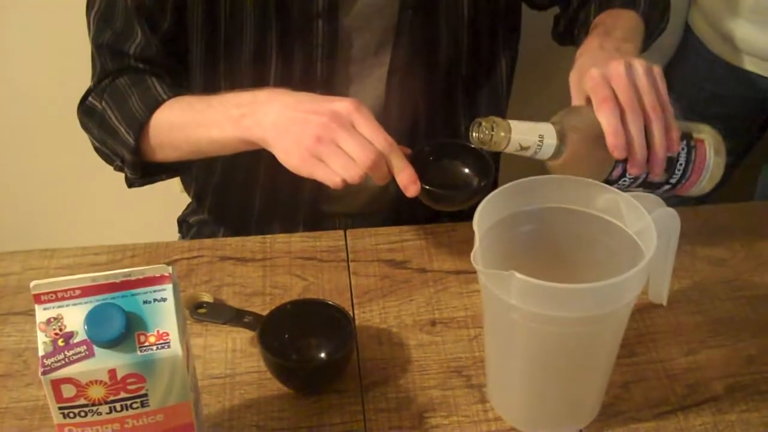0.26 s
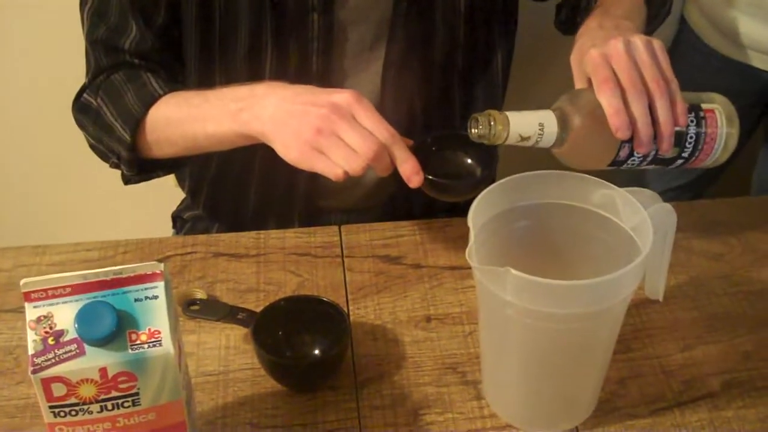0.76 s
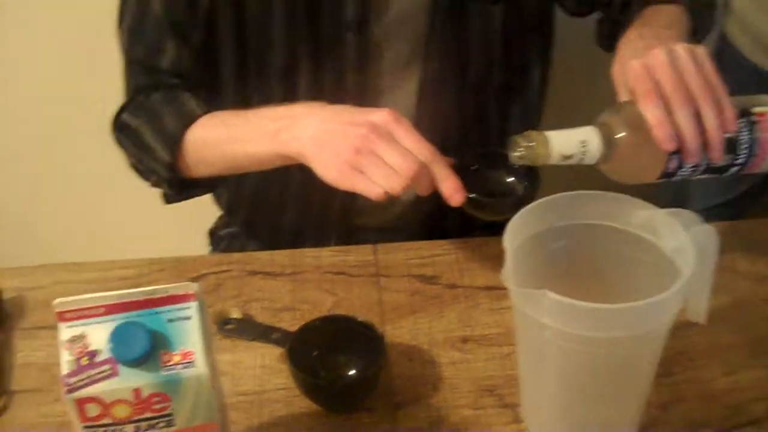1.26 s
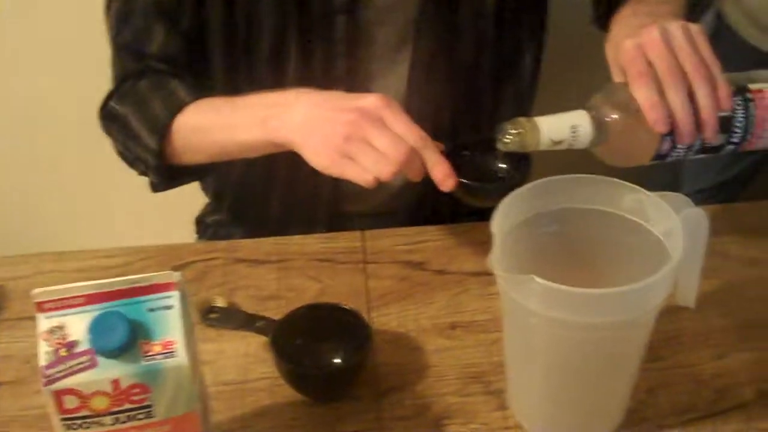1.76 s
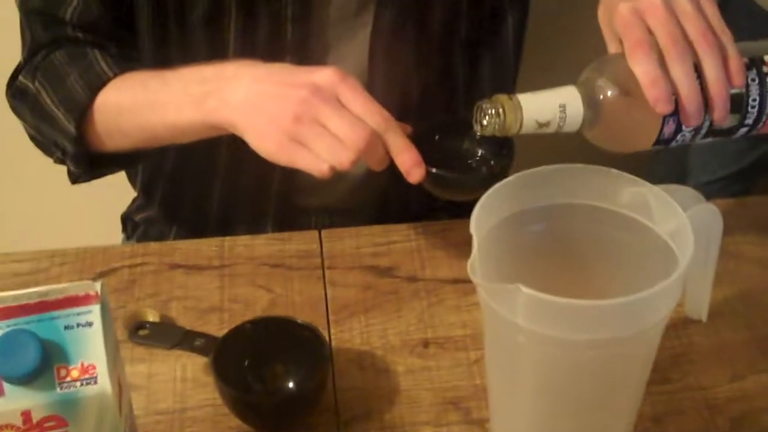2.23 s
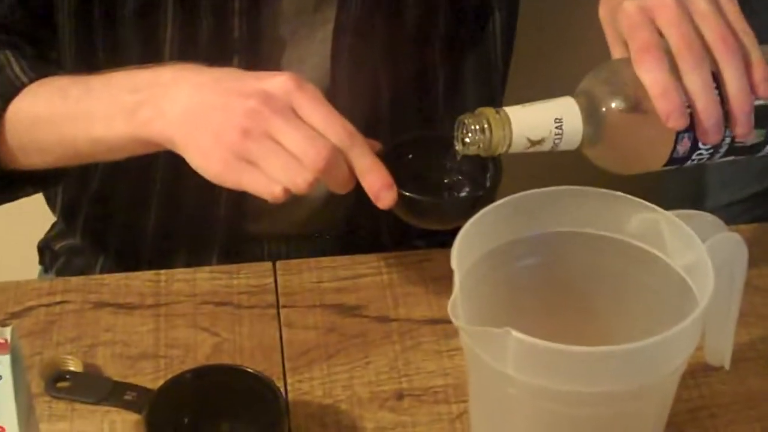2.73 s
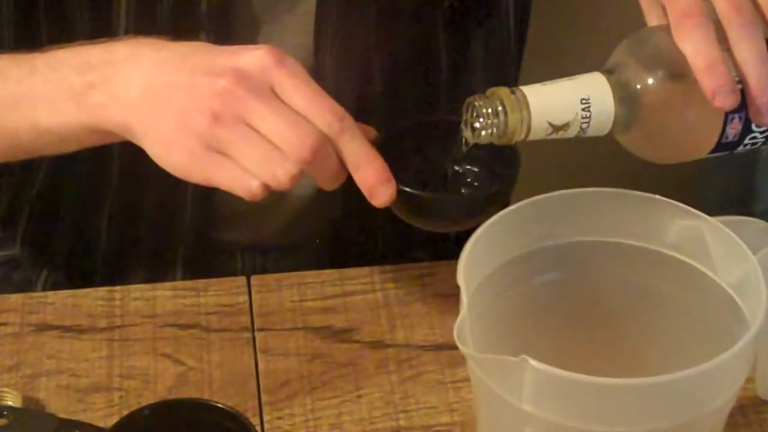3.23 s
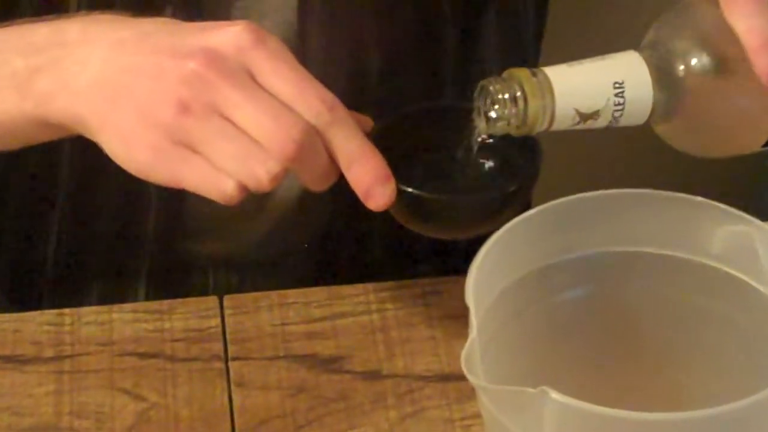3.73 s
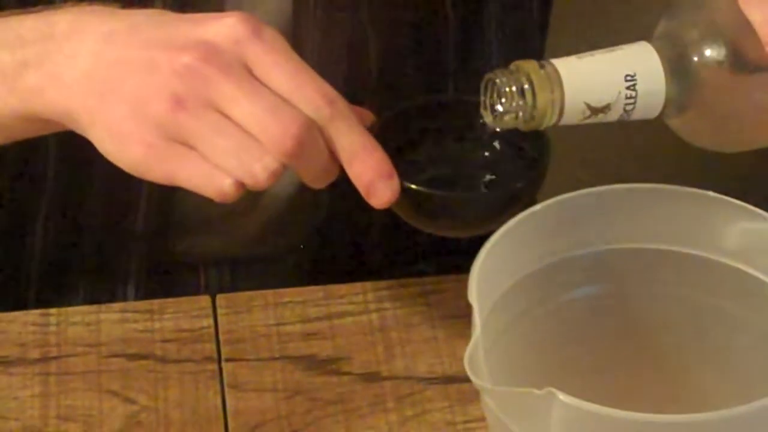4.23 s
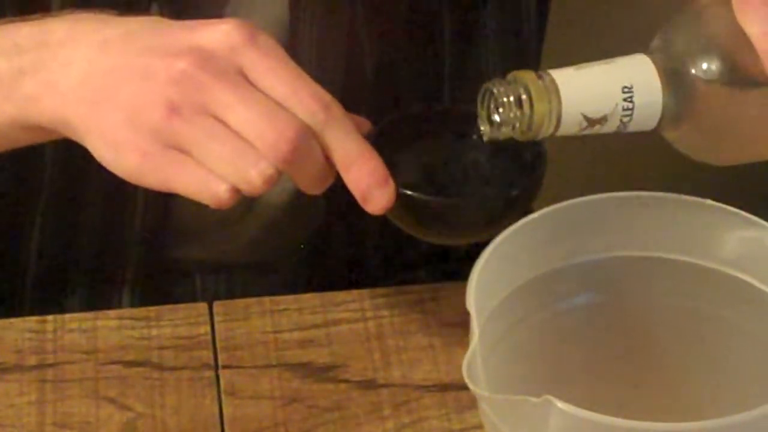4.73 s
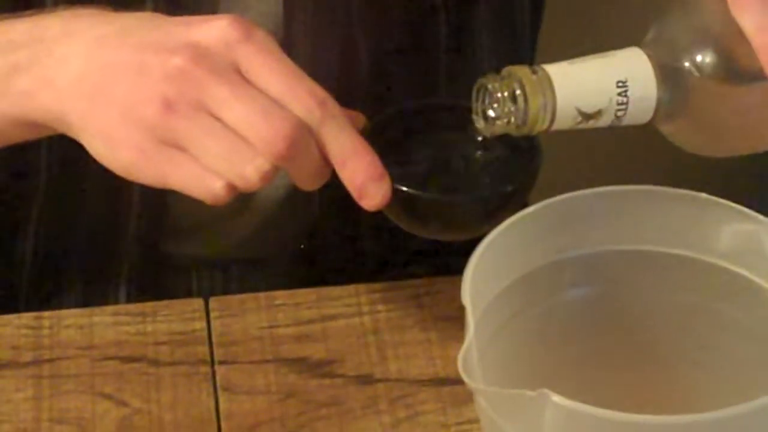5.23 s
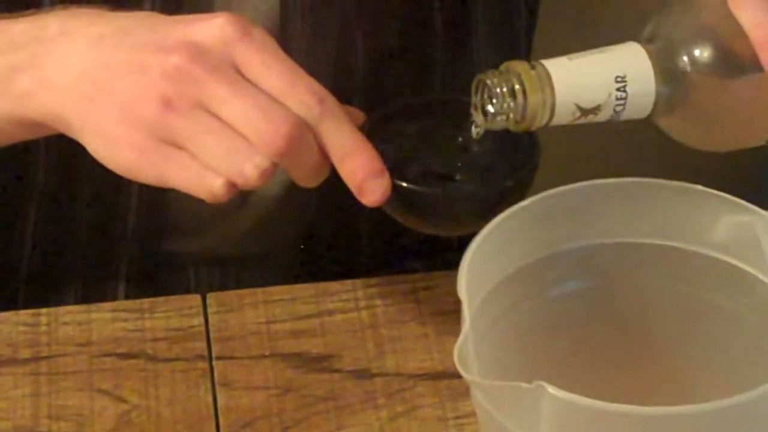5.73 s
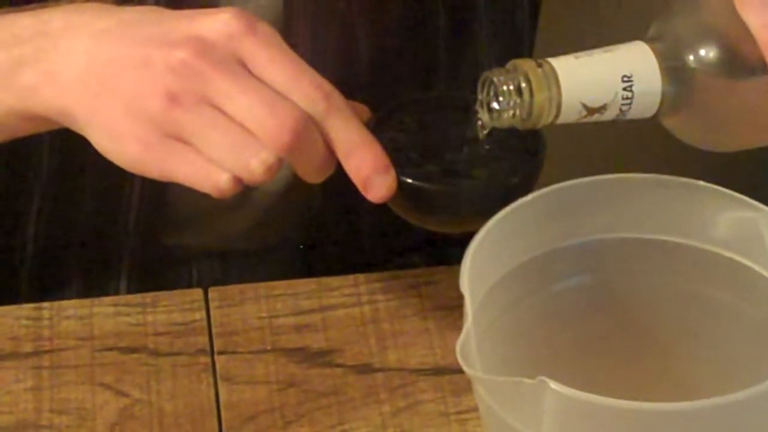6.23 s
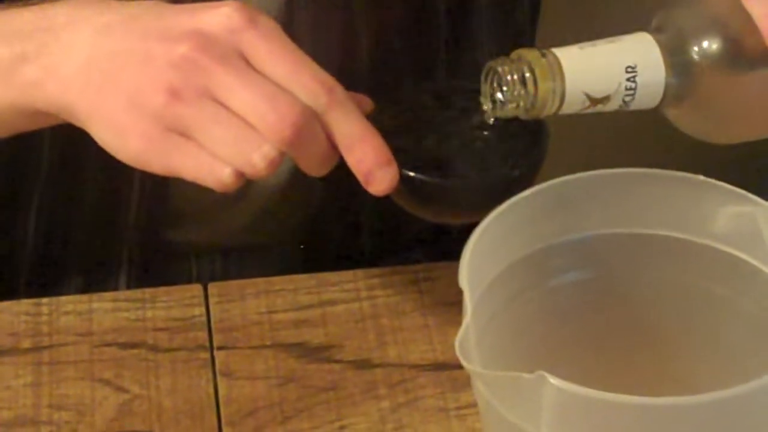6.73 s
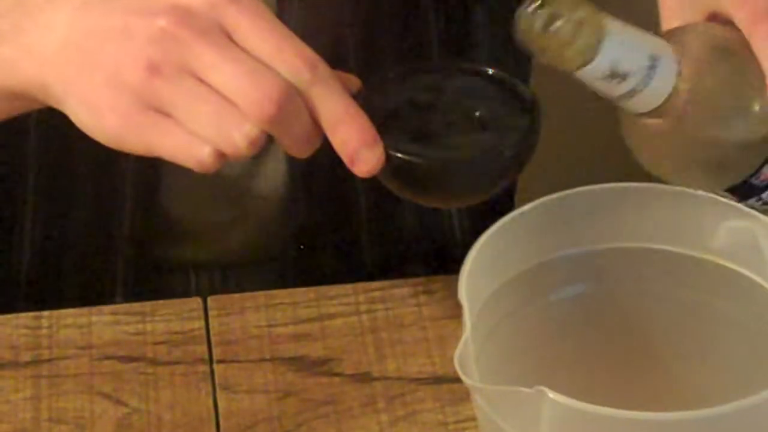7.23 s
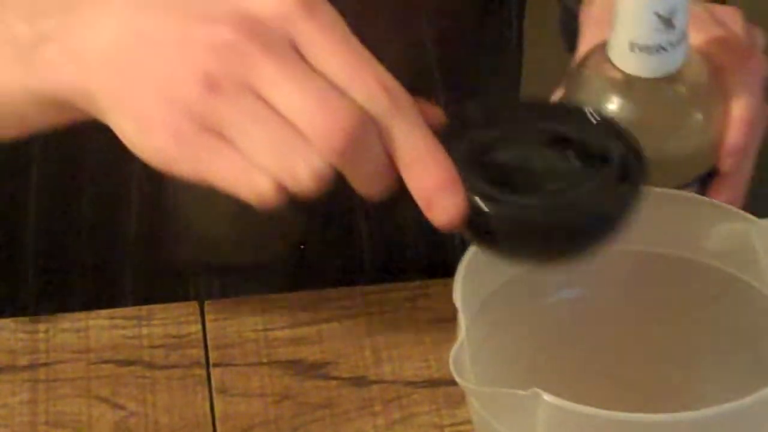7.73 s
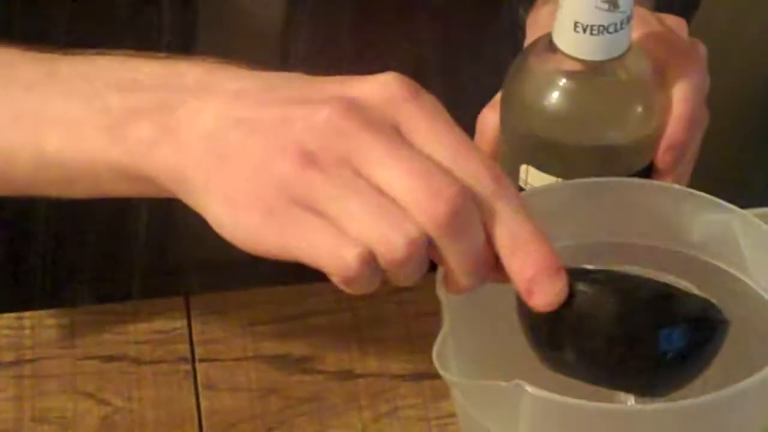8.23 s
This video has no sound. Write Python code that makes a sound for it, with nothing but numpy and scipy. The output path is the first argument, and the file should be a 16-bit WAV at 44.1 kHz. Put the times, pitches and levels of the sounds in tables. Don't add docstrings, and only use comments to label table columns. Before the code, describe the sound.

Close stereo pickup indoors: steady soft hum and airy hiss throughout. Hollow, quick glugs from a bottle neck, pitch rising as it tips, with tiny bubble plinks, crisp taps on a plastic cup, glassy clinks and soft hand bumps. Pouring fades to a few drips, then a pause. A hard wooden thunk with short rocking knocks follows, and liquid slaps and bubbles brightly into a plastic pitcher, ending abruptly.

```python
import sys
import numpy as np
from scipy import signal
from scipy.fft import rfft, irfft
from scipy.io import wavfile
from scipy.ndimage import uniform_filter1d, map_coordinates

SR = 44100
rng = np.random.default_rng(int(sys.argv[2]) if len(sys.argv) > 2 else 0)


def dump_mix(stems):
    frames = np.atleast_2d(stems).T
    limited = np.clip(frames, -1, 1)
    pcm = np.round(limited * 32767).astype(np.int16)
    wavfile.write(sys.argv[1], SR, pcm)


def amplitude_ratio(level_db):
    exponent = np.asarray(level_db, float) / 20
    return 10 ** exponent


N = 373659


def at_hz(points, hz):
    table_hz, values = np.array(points).T
    return np.interp(np.log(np.maximum(hz, 1)), np.log(table_hz), values)


def rms_one(x):
    return x / np.sqrt(np.mean(x ** 2) + 1e-20)


def drift(rate_hz):
    knots = rng.standard_normal(400)
    return map_coordinates(knots, [20 + np.arange(N) / SR * rate_hz], order=3)


def add_ring(out, s, db, hz, t60, rise=0., attack_s=0.0003):
    start = int(s * SR)
    t = np.arange(min(int(t60 * SR), N - start)) / SR
    shape = amplitude_ratio(db - 60 * t / t60) * (1 - np.exp(-t / attack_s))
    out[start:start + len(t)] += shape * np.sin(2 * np.pi * hz * (t + rise * t * t / (2 * t60)))


def around(x, hz, octaves):
    edges = np.clip(hz * 2 ** (np.array([-.5, .5]) * octaves), 100, 18000)
    return signal.sosfilt(signal.butter(2, edges, "band", fs=SR, output="sos"), x)


def add_crack(out, s, db, hz, octaves, t60, attack_s=.0001):
    start = int(s * SR)
    t = np.arange(int(SR * min(t60 + .01, .2))) / SR
    burst = rng.standard_normal(len(t)) * amplitude_ratio(-60 * t / t60) * (1 - np.exp(-t / attack_s))
    burst = around(burst, hz, octaves)[:N - start]
    out[start:start + len(t)] += amplitude_ratio(db) * burst / np.abs(burst).max()


def add_click(out, s, db, hz, octaves):
    start = int(s * SR)
    pulse = around(signal.unit_impulse(SR // 50), hz, octaves)[:N - start]
    out[start:start + len(pulse)] += amplitude_ratio(db) * pulse / np.abs(pulse).max()


def add_struck(out, s, db, modes, spread_db):
    for hz, mode_db, t60 in modes:
        luck, late = rng.standard_normal(2)
        add_ring(out, s + .0004 * abs(late), db + mode_db + spread_db * luck, hz, t60)


def tone(hz, db, pan_db, lead):
    phase = 2 * np.pi * hz * np.arange(N) / SR + 0.46 * drift(1.57) + rng.uniform(0, 2 * np.pi)
    level = np.sqrt(2) * amplitude_ratio(db + drift(2.803))
    ports = amplitude_ratio(np.array([[pan_db / 2], [-pan_db / 2]]))
    return level * ports * np.sin(phase + [[lead], [0]])


# [f/Hz, level/dB rms, left-right/dB, left lead/rad]
HUM = [(118.8, -67.5, -2.5, 0.091), (147, -80, 1, 0.11), (218.5, -51.5, 1, 0.085), (232.7, -63, -4, .1),
       (326.3, -61, 0.5, 0.11), (468.7, -51, .5, 0.39), (829, -67.5, 6, .3), (3710, -83, 19.5, 0.46)]
# [f/Hz, level at rest/dB, gain under load/dB, busiest t/s, width/s]
WHINES = [(6000, -78.5, 5.5, 6.1, 0.61), (7000, -84.5, 5, 5.7, .7), (8000, -78.5, 9.5, 11, 8.5)]
# [left-right/dB, left lead/rad]
WHINE_PORTS = [(-10.5, 1.9), (19, 1.4), (20.5, 2.7)]


def hum():
    t = np.arange(N) / SR
    out = sum(tone(*row) for row in HUM)
    for (hz, db, load_db, s, width_s), (pan_db, lead) in zip(WHINES, WHINE_PORTS):
        load = np.exp(-((t - s) / width_s) ** 2)
        out = out + tone(hz, db + load_db * load + .8 * drift(1.11), pan_db, lead)
    return out


def motor():
    motor_hz, motor_db, beat_s, null_s = 58.8, -68.5, 2.24, 1.76
    t = np.arange(N) / SR
    beat, turn = np.pi * (t - null_s) / beat_s, 2 * np.pi * motor_hz * t
    pair = np.sin(beat) * np.sin(turn) + 0.11 * np.cos(beat) * np.cos(turn)
    return 2 * amplitude_ratio(motor_db) * pair * amplitude_ratio([[-.9], [.9]])


# [f/Hz, likeness]
LIKENESS = [(60, 0.34), (150, 0.87), (380, 0.95), (940, 0.87), (2350, 0.37), (5890, 0), (14800, 0.22)]


def alike_at(hz):
    return np.clip(at_hz(LIKENESS, hz), 0, 1)


def coloured(spectrum):
    hz = np.fft.rfftfreq(N, 1 / SR)
    mid, side = rfft(rng.standard_normal((2, N))) * amplitude_ratio(at_hz(spectrum, hz))
    mid = np.sqrt(1 + alike_at(hz)) * mid
    side = np.sqrt(1 - alike_at(hz)) * side
    return rms_one(irfft(np.array([mid + side, mid - side]), N))


# [f/Hz, level/dB per Hz]
AIR = [(12, -56), (20, -18.5), (159, -12.5), (188, -9.5), (214, -6), (237, -8.5), (264, -4), (384, -6.5),
       (464, -1), (585, -11.5), (927, -9), (1010, -12), (1440, -16.5), (2060, -28), (3000, -40.5),
       (3900, -81), (6600, -120)]
# [f/Hz, level/dB per Hz]
HISS = [(880, -11.5), (1500, -9), (2060, -6), (5840, -11.5), (6610, -12.5), (7640, -10.5), (8250, -13.5),
        (8580, -16), (13600, -18), (14600, -20), (15000, -63)]
# [t/s, level/dB, rise/s, fall/s]
RUSTLE = [(1.1, 2, .25, 0.77), (3.8, .5, .5, .4), (7.72, 2.5, 0.23, 0.16)]


def background():
    air_db, hiss_db = -49, -60
    t, swell_db = np.arange(N) / SR, 0
    for s, db, rise_s, fall_s in RUSTLE:
        swell_db = swell_db + db * np.exp(np.minimum((t - s) / rise_s, (s - t) / fall_s))
    return amplitude_ratio(air_db) * coloured(AIR) + amplitude_ratio(hiss_db + swell_db) * coloured(HISS)


# [t/s, peak level/dB, second mode/dB, upper modes/dB]
GULPS = [(0.0946, -49, -28, -9), (0.2967, -51.5, -26, 0), (0.4909, -42, -10, -2.5), (0.6837, -45, -2.5, -3),
         (0.9734, -47, -3, 2.5), (1.208, -44.5, -7, 3), (1.4046, -46, -5, -4), (1.615, -37.5, 1.5, 8.5),
         (1.8359, -40.5, -3.5, 2.5), (2.0536, -43, 0, 7.5), (2.2738, -45, -3, 5), (2.4897, -43, -6, 11.5),
         (2.709, -42.5, -19, 11), (2.923, -39.5, 1, 13), (3.127, -46.5, -30, 9.5), (3.3336, -46, 2, 7),
         (3.5456, -49, -5, 10.5), (3.774, -45.5, -6, 3.5), (4.003, -57, -14, 6.5), (4.2497, -50, -4, 9),
         (4.4698, -43.5, 3.5, 3.5)]
# [f/Hz, level/dB, t60/s]
NECK = [(3400, 0, .035), (5400, -4, .011), (7200, -7, .018)]
# [f/Hz, level/dB, t60/s]
BELLY = (150, -47, .2)


def gulps():
    out = np.zeros(N)
    belly_hz, belly_db, belly_t60 = BELLY
    for s, db, second_db, upper_db in GULPS:
        hz = 1275 - 425 * np.exp(-s / 0.58) + 19.3 * s
        add_ring(out, s, db + 10.5, hz, t60=0.055, rise=0.064, attack_s=0.00037)
        add_crack(out, s, db + 2, hz * 1.05, octaves=.4, t60=.035)
        add_ring(out, s, belly_db, belly_hz, belly_t60, attack_s=0.019)
        bright_db = db + upper_db
        add_crack(out, s, bright_db + 0.5, hz=6300, octaves=1.06, t60=0.0069)
        add_ring(out, s, bright_db + 1, 5280, .009, rise=0.019)
        add_crack(out, s, bright_db - 9, hz=11500, octaves=0.55, t60=0.0064)
        for k, (mode_hz, mode_db, t60) in enumerate(NECK):
            fill = 1 + .007 * rng.standard_normal()
            add_ring(out, s, db + mode_db + (upper_db if k else second_db), mode_hz * fill, t60)
    return out


# [t/s, peak level/dB, f/Hz, t60/s]
BUMPS = [(0.104, -47.5, 147, 0.63), (0.454, -36, 300, 0.071), (0.661, -33.5, 293, 0.099),
         (3.114, -28.5, 157, 0.071), (3.113, -38, 95.5, 0.18), (3.158, -34, 153, 0.085),
         (3.236, -36, 109, 0.1), (3.302, -38.5, 154, 0.086), (7.901, -34, 147, 0.058),
         (8.039, -42.5, 155, 0.28)]


def hands():
    out = np.zeros(N)
    for bump in BUMPS:
        add_ring(out, *bump, attack_s=0.00093)
    return out


# [t/s, peak level/dB, f/Hz]
DROPS = [(0.3244, -49.5, 6700), (0.9293, -51, 5700), (1.5576, -40, 5100), (1.5576, -46, 7200),
         (1.95, -49, 2420), (2.355, -35.5, 6970), (2.367, -46, 7600), (2.385, -55, 7000),
         (2.7676, -45, 5200), (3.3662, -47, 6100), (3.44, -43, 6100), (3.44, -39, 6870),
         (3.5728, -46, 2970), (3.6314, -46.5, 7100), (3.9045, -50, 4600), (4.117, -51.5, 4100),
         (4.272, -46, 2800), (4.424, -52, 8200), (4.4334, -57, 5650), (4.4334, -51, 7400),
         (4.705, -51, 5540), (4.705, -53.5, 8000), (4.718, -52, 5600), (4.718, -53, 7500),
         (4.769, -49.5, 7600), (4.958, -52, 8800), (4.9275, -50.5, 2760), (4.9275, -51, 8000),
         (5.1427, -47, 7300), (5.2564, -43, 8450), (5.465, -44.5, 6100), (5.465, -49, 7050),
         (5.532, -52, 3670), (5.7244, -48.5, 5200)]


def drops():
    out = np.zeros(N)
    for s, db, hz in DROPS:
        add_ring(out, s, db - 3.5, hz, t60=0.032, rise=0.029)
        add_crack(out, s, db, hz, octaves=0.32, t60=0.011)
        add_crack(out, s, db - 8, hz=7500, octaves=1.4, t60=0.008)
    return out


# [t/s, peak level/dB, low modes/dB, high modes/dB, crack/dB]
TAPS = [
    (1.0337, -20, -16.5, 2, 5.5),
    (1.1333, -17.5, -15.5, -1, 0),
    (1.2346, -18.5, -17.5, 5, 8.5),
    (1.4297, -34.5, 0.5, 0.5, -20),
]
# [f/Hz, level/dB, t60/s]
CUP = [(870, -4, 0.12), (1180, 0, .03), (1410, -3, .06), (1595, 3, .04), (1895, -7, .04), (2100, -11, .03),
       (2670, 3, 0.02), (2705, -15, 0.11), (4230, -2, .02), (4312, -11, 0.1), (4352, -10, 0.09),
       (5050, -6, 0.011), (5650, -1, 0.012), (6800, -8, .01), (7095, -7, 0.045), (7200, -2, 0.013),
       (7980, -6, 0.011), (9300, -7, 0.008)]


def taps():
    out = np.zeros(N)
    for s, db, low_db, high_db, crack_db in TAPS:
        add_struck(out, s, db + low_db, CUP[:6], spread_db=1)
        add_struck(out, s, db - 6.5, CUP[6:11], spread_db=1)
        add_struck(out, s, db + high_db - 4.5, CUP[11:], spread_db=2.5)
        add_click(out, s, db + crack_db + 3, hz=4430, octaves=1.83)
        add_crack(out, s, db + low_db + 0.5, hz=1530, octaves=1.4, t60=0.16)
        add_crack(out, s, db - 20, hz=11800, octaves=.6, t60=0.005)
        add_crack(out, s, db - 14, hz=5000, octaves=1.4, t60=0.053)
    return out


# [t/s, peak level/dB, centre f/Hz,
# width/octaves, t60/s]
CONTACTS = [(1.43, -34.5, 6500, 1, 0.021), (4.9275, -38, 6000, 2.1, .006), (4.978, -36.5, 6850, .6, 0.011),
            (4.9844, -47, 5030, 1.9, .01), (8.1278, -33, 5000, 0.95, 0.0075), (8.139, -39, 5000, 1.5, 0.0083),
            (8.1454, -43, 5000, 1.7, 0.011), (8.2127, -30, 5500, 1.2, 0.0096),
            (1.4302, -28.5, 1490, 1.4, 0.11), (1.431, -39, 2680, 0.12, 0.083), (2.677, -43, 3700, 1.2, .03),
         (3.573, -49, 2820, 0.26, .03), (4.977, -34, 1090, 1.1, 0.02), (4.979, -41.5, 2200, 0.64, .012),
         (4.978, -42, 4000, .25, 0.013), (5.532, -47, 3700, 0.46, 0.054), (8.127, -38.5, 1940, 0.4, 0.025),
         (8.2117, -30, 1370, 1.05, 0.02)]


def ticks():
    out = np.zeros(N)
    for contact in CONTACTS:
        add_crack(out, *contact)
    return out


# [t/s, modes [f/Hz, level/dB, t60/s]]
CLINKS = [
    (2.236, [(2830, -54, 0.092), (4170, -43, 0.06), (4650, -39, 0.05), (4640, -43.5, 0.22), (5500, -31, 0.024), (5700, -31, 0.036), (6800, -44, 0.035), (7550, -42, .03), (7940, -35, 0.034), (8900, -59, 0.036), (10900, -43, 0.032)]),
    (2.6766, [(2940, -53, 0.037), (4700, -63, 0.03), (5450, -41, 0.03), (5750, -30, 0.035), (6400, -34, .03), (6700, -29, 0.039), (6910, -28, 0.069), (7500, -35, 0.12), (7900, -29, 0.054), (8900, -57, .03)]),
]


def clinks():
    out = np.zeros(N)
    for s, modes in CLINKS:
        loudest_db = max(db for hz, db, t60 in modes)
        add_crack(out, s, loudest_db + 0.55, hz=6500, octaves=0.57, t60=0.022)
        for hz, db, t60 in modes:
            add_ring(out, s, db, hz, t60)
    return out


# [t/s, peak level/dB, glass/dB, crack/dB, favoured f/Hz]
KNOCKS = [
    (7.6762, -8.5, -24, -22, 770),
    (7.682, -14.5, -48, -36, 260),
    (7.694, -15, -48, -36, 550),
    (7.705, -20, -43, -22, 597),
    (7.727, -20, -43, -30, 450),
    (7.836, -25, -24, -21, 705),
    (7.928, -28, -26, -32, 306),
    (8.035, -30, -39, -29, 500),
]
# [f/Hz, level/dB, t60/s]
TABLE = [(146, -6, .5), (184, -12, .12), (258, 7, .12), (317, -4, .1), (366, 0, .16), (424, -4, .1),
         (455, 1, .1), (520, -3, .09), (560, 2, .08), (641, -5, .12), (690, -3, .08), (750, 3, .07),
         (813, 0, .07), (899, -5, .08), (1040, -1, .07), (1130, -5, .07), (1217, -3, .06), (1314, 2, .05),
         (1610, -8, .05), (1793, -8, .05)]
# [f/Hz, level/dB, t60/s]
GLASS = [(2900, -3, .02), (3860, -10, .03), (6000, -3, .02), (6450, -14, .2), (7150, -14, .08)]
# [t/s, level/dB, f/Hz, t60/s]
SING = [(7.708, -40.5, 6470, 0.19), (7.84, -54, 7400, .06)]


def table():
    out = np.zeros(N)
    for s, db, glass_db, crack_db, centre_hz in KNOCKS:
        add_struck(out, s, db + glass_db, GLASS, spread_db=0.6)
        for hz, mode_db, t60 in TABLE:
            far_db = 6 * abs(np.log2(hz / centre_hz))
            add_ring(out, s + .001 * rng.random(), db + mode_db - 14.5 - far_db, hz, t60)
        add_crack(out, s, db + crack_db, hz=6000, octaves=1.6, t60=0.23, attack_s=0.0048)
        add_crack(out, s, db + crack_db - 0.5, hz=2060, octaves=0.8, t60=0.18, attack_s=0.0004)
        add_crack(out, s, db - 5.5, centre_hz, octaves=1.42, t60=0.13, attack_s=0.00024)
        add_click(out, s, db - 8, centre_hz * 1.24, octaves=2.85)
    for ring in SING:
        add_ring(out, *ring, attack_s=0.00093)
    return out


# [t/s, level/dB]
SPLASH = [(8.202, -69), (8.234, -45), (8.24, -43), (8.285, -38), (8.315, -57), (8.34, -37), (8.39, -36.5),
          (8.47, -37.5)]


def fizz(low_hz, high_hz, per_s, cycles):
    size = N - int(SPLASH[0][0] * SR)
    sizes = amplitude_ratio(2.8 * np.minimum(rng.exponential(1, size), 4))
    clicks = (rng.random(size) < per_s / SR) * sizes * rng.choice([-1, 1], size)
    dealt, out = rng.integers(0, 16, size), np.zeros(N)
    for k, hz in enumerate(np.geomspace(low_hz, high_hz, 16)):
        r = amplitude_ratio(-60 * hz / (cycles * SR))
        w = 2 * np.pi * hz / SR
        out[-size:] += signal.lfilter([0, np.sin(w)], [1, -2 * r * np.cos(w), r * r], clicks * (dealt == k))
    return out / np.std(out[-size:])


# [t/s, peak level/dB, centre f/Hz, trapped air pocket/dB, spray/dB]
GOUTS = [(8.237, -9.5, 7600, -39, -30), (8.247, -24, 8000, -60, -30), (8.255, -20, 6100, -46, -23),
         (8.2622, -10.5, 7430, -48, -17), (8.273, -25, 5960, -48, -30), (8.288, -23, 6300, -55, -32),
         (8.3194, -11.5, 6900, -62, -42), (8.327, -26, 7500, -60, -29), (8.3345, -17, 7440, -56, -34),
         (8.341, -13, 7000, -49, -32), (8.352, -25, 6200, -50, -36), (8.3634, -8, 5170, -38, -22),
         (8.3679, -7.5, 5640, -38, -15.5), (8.375, -20, 6500, -39, -28), (8.388, -27, 6000, -36, -36),
         (8.401, -18, 6500, -44, -36), (8.4064, -15, 6670, -22.5, -32), (8.4116, -12, 5800, -28, -26),
         (8.416, -21, 6500, -30, -34), (8.4288, -11.5, 6940, -28, -32), (8.438, -27, 7000, -36, -32),
         (8.4502, -12.5, 6000, -25.5, -32), (8.4567, -12, 7200, -34, -25), (8.4644, -11, 6500, -40, -27)]
# [t/s, peak level/dB, f/Hz, t60/s, share the pitch climbs]
BUBBLES = [(3.571, -41.5, 3010, .04, -.03), (3.576, -51, 2620, 0.05, .01), (4.272, -50, 4180, .03, .02),
           (8.272, -32, 4230, 0.017, .05), (8.37, -30, 3500, .03, 0.062), (8.385, -35, 3100, .02, .05),
           (8.391, -34, 3100, .015, .05), (8.4066, -24.5, 3160, .03, .06), (8.411, -24, 4300, .02, .05),
           (8.427, -31, 3100, 0.016, 0.091), (8.436, -32, 3400, .02, .05), (8.449, -29, 3000, .015, .1),
           (8.455, -29, 4220, .02, .05), (8.461, -32, 4000, .02, .05)]


def splash():
    s, flow_db = np.transpose(SPLASH)
    t = np.arange(N) / SR
    bed = fizz(5800, 9400, per_s=2500, cycles=13) + amplitude_ratio(-4.5) * fizz(5300, 16000, per_s=10000, cycles=6.9)
    churn_db = -27.5 + 297 * np.maximum(t - 8.39, 0)
    churn = amplitude_ratio(churn_db) * fizz(1800, 3950, per_s=4900, cycles=52)
    out = amplitude_ratio(np.interp(t, s, flow_db)) * (bed + churn)
    for bubble in BUBBLES:
        add_ring(out, *bubble)
    pocket_hz, t60 = 3350, .026
    for s, db, hz, pocket_db, spray_db in GOUTS:
        add_crack(out, s, pocket_db, pocket_hz * 1.3, octaves=0.85, t60=t60 * 1.5)
        this_hz = pocket_hz * np.exp(0.039 * rng.standard_normal())
        add_ring(out, s, pocket_db + 0.5, this_hz, t60 * 0.72, rise=0.08)
        add_crack(out, s, db - 7, hz, octaves=0.5, t60=t60 * 0.6)
        add_click(out, s, db - 7, hz * 1.03, octaves=0.39)
        add_crack(out, s, spray_db, hz=12000, octaves=0.7, t60=0.034)
        for late, apart in rng.uniform(-1, 1, (16, 2)):
            bubble_db = db - 18 - 9.1 * late ** 2
            add_ring(out, s + 0.61 * t60 * late ** 2, bubble_db, hz * np.exp(0.332 * apart), .011, rise=0.23)
    return out


# [f/Hz, t60/s]
ROOM = [(100, 0.75), (500, 0.61), (2000, 0.42), (6000, 0.23), (12000, 0.21)]
# [t/s, level over the tail/dB]
ECHOES = [(0.01, 3.5), (0.027, -7), (.041, -5)]


def room_tail():
    size = SR // 2
    edges = 60 * 2 ** np.arange(9)
    t, white, tail = np.arange(size) / SR, rng.standard_normal((3, size)), 0
    for low, high in zip(edges, edges[1:]):
        band = signal.sosfilt(signal.butter(2, [low, high], "band", fs=SR, output="sos"), white)
        centre_hz = low * np.sqrt(2)
        alike = alike_at(centre_hz)
        band = np.sqrt(alike) * band[0] + np.sqrt(1 - alike) * band[1:]
        tail = tail + band * amplitude_ratio(-60 * t / at_hz(ROOM, centre_hz))
    tail = tail * (1 - np.exp(-(t / 0.0081) ** 2))
    tail = tail * (1 + sum(amplitude_ratio(db) * np.exp(-((t - s) / 0.0049) ** 2) for s, db in ECHOES))
    spectrum = rfft(tail, 2 * size)
    fine, broad = [uniform_filter1d(np.abs(spectrum) ** 2, size=bins) for bins in (150, 1500)]
    tail = irfft(spectrum * np.sqrt(broad / fine))[:, :size] * (1 - np.exp(-t / .002))
    return amplitude_ratio(-7) * tail / np.sqrt(np.sum(tail ** 2) / 2)


# [f/Hz, left-right/dB]
LEFT_PORT = [(60, -1.5), (300, .5), (2500, .5), (4300, -2), (6500, 3), (8000, 9), (10000, 13), (15000, 13)]
# [f/Hz, phase/rad]
LEFT_LEAD = [(500, 0), (2600, -.1), (5000, -.7), (6800, .4), (8000, -1), (10200, -2.4), (13000, -2.8)]
# [f/Hz, level/dB]
MIC = [(1000, -1), (7000, 1), (9000, -5), (11000, -11.5), (15000, -12)]


def in_room(x):
    wet = x + signal.fftconvolve(x[None], room_tail(), axes=1)[:, :N]
    hz = np.fft.rfftfreq(N, 1 / SR)
    tilt = amplitude_ratio(at_hz(LEFT_PORT, hz) / 2) * np.exp(.5j * at_hz(LEFT_LEAD, hz))
    return irfft(rfft(wet) * amplitude_ratio(at_hz(MIC, hz)) * [tilt, 1 / tilt], N)


def scene():
    near = gulps() + hands() + drops() + taps() + ticks() + clinks() + table() + splash()
    near = signal.sosfilt(signal.butter(3, 115, "high", fs=SR, output="sos"), near)
    return hum() + motor() + background() + in_room(near)


def band_limit(x):
    return signal.sosfilt(signal.butter(12, 15350, fs=SR, output="sos"), x)


def record(dry):
    mix = signal.sosfilt(signal.ellip(10, .5, 60, 14250, fs=SR, output="sos"), dry)
    return band_limit(mix)


dry = scene()
out = record(dry)
dump_mix(out)
```